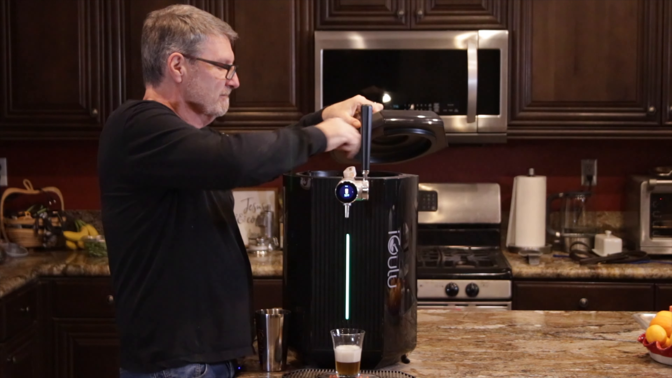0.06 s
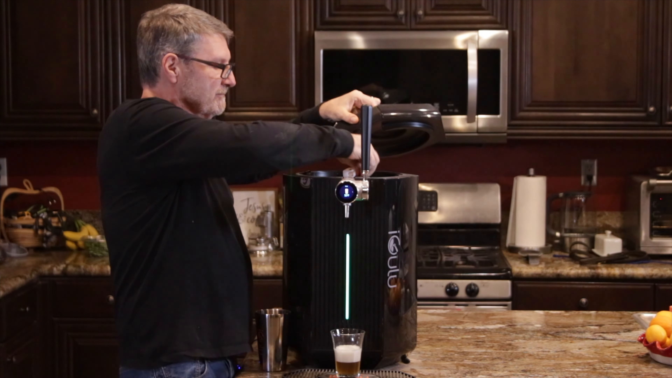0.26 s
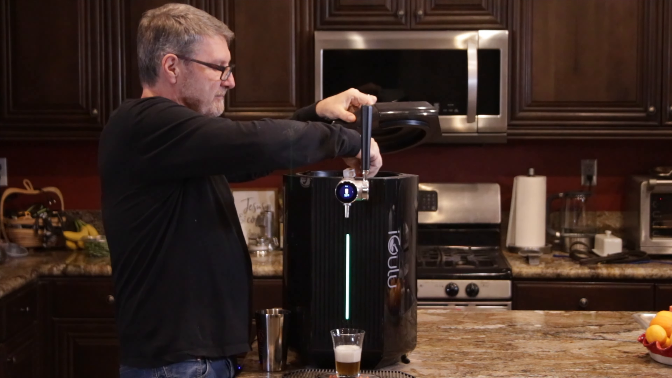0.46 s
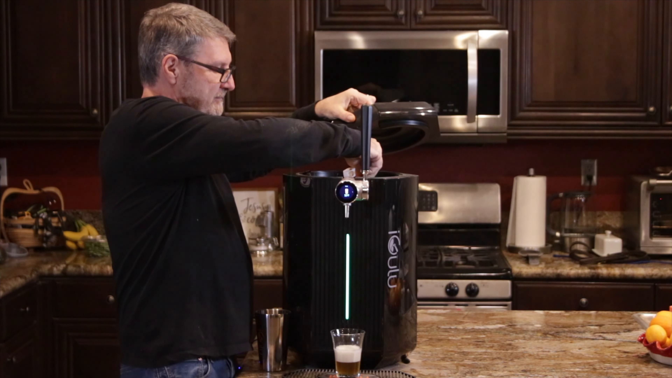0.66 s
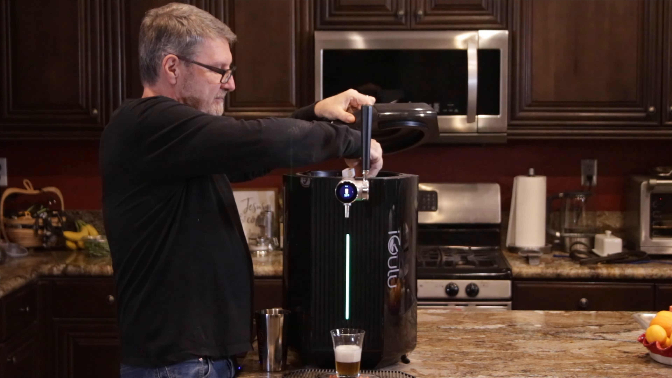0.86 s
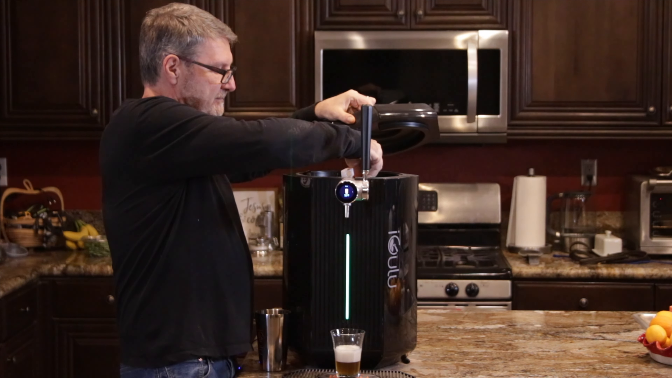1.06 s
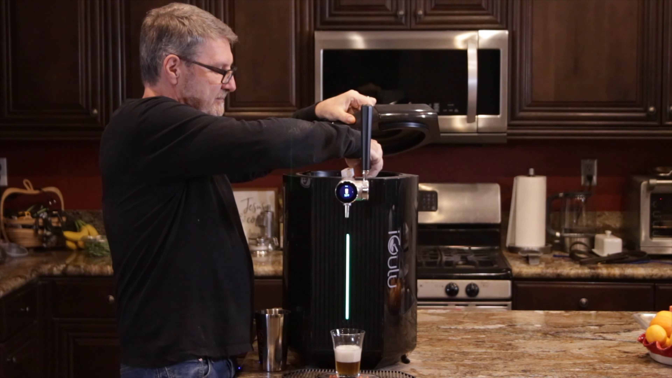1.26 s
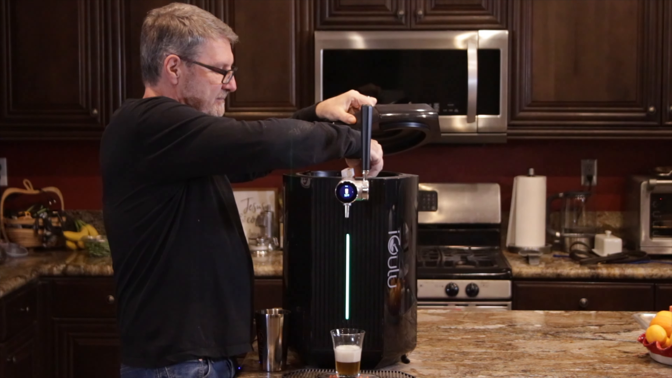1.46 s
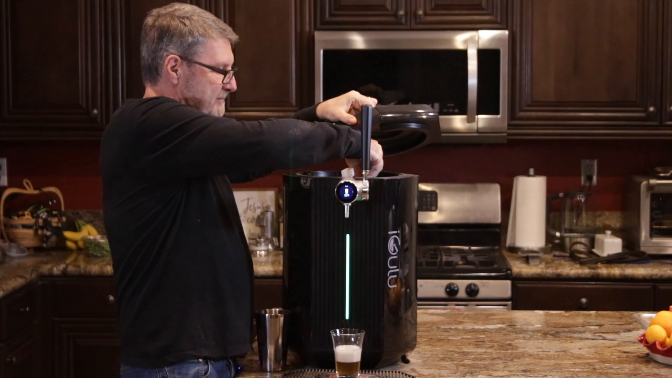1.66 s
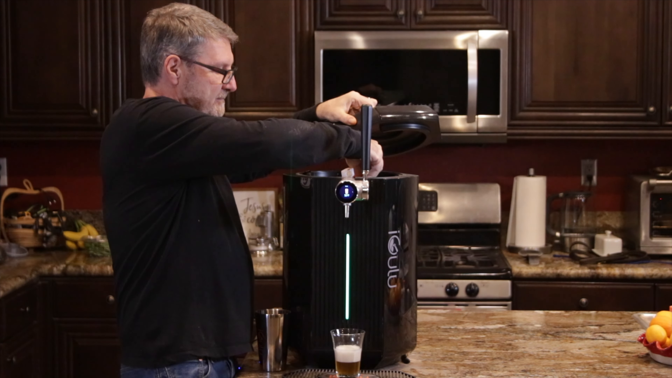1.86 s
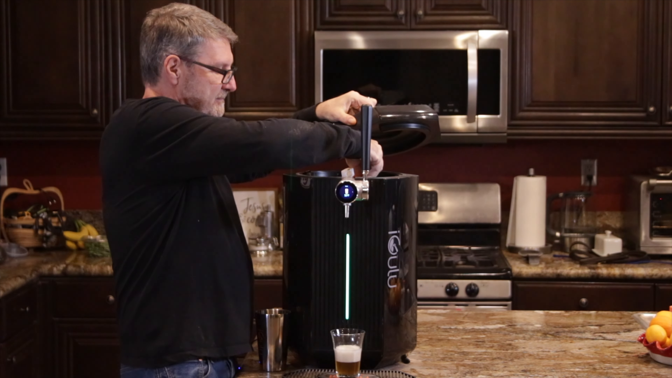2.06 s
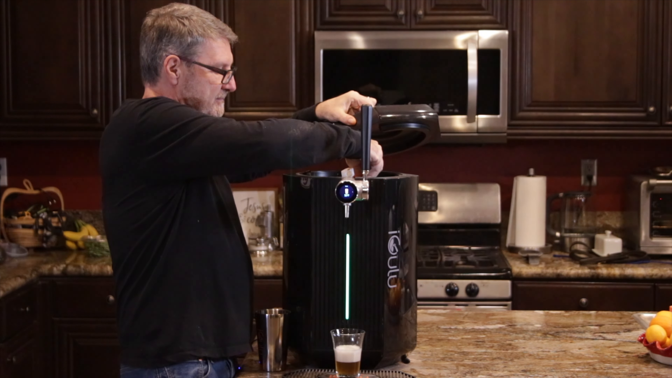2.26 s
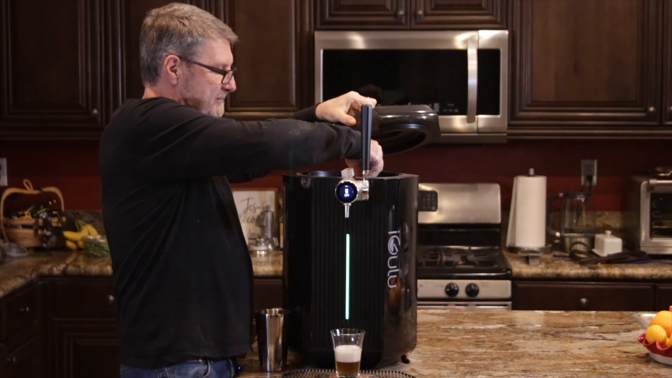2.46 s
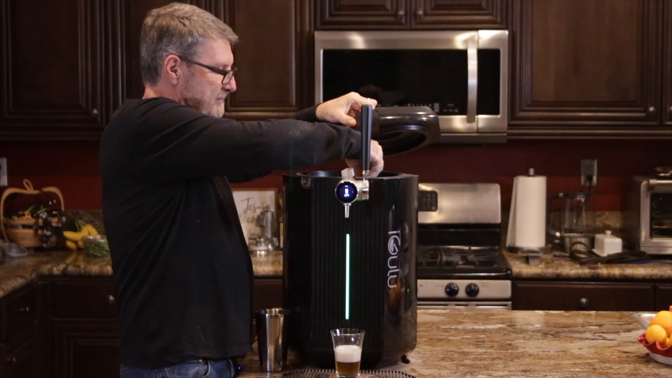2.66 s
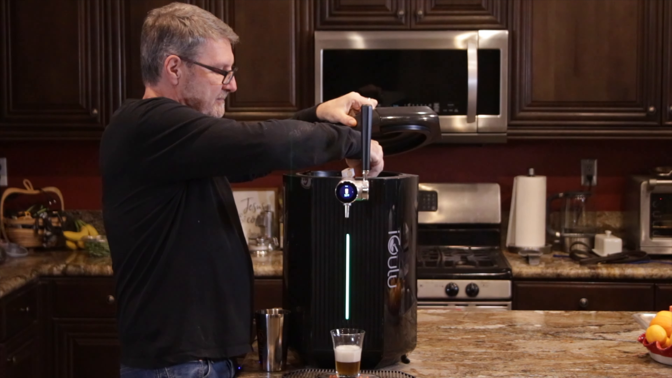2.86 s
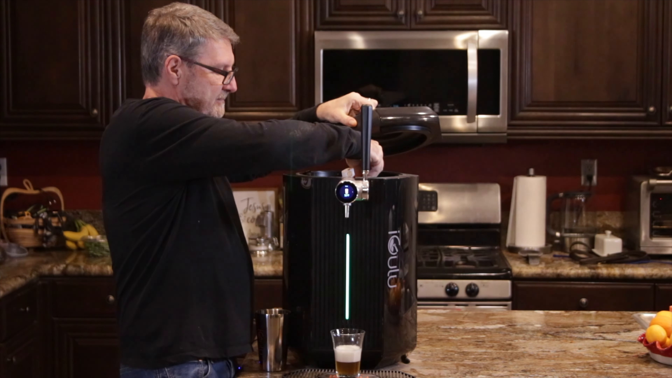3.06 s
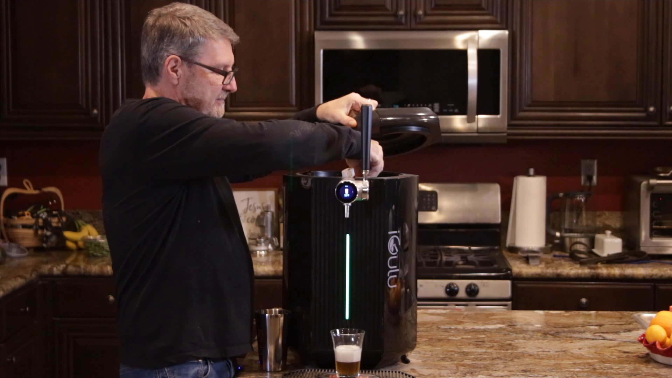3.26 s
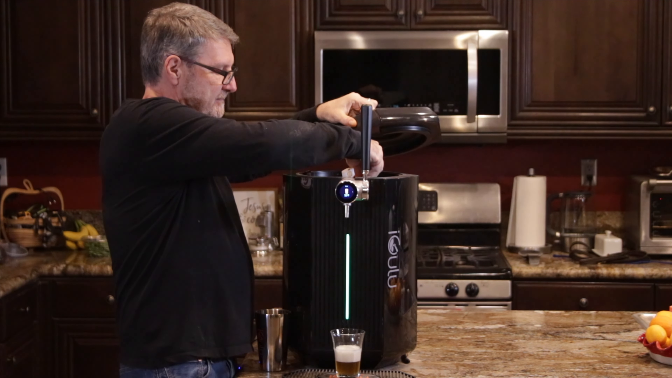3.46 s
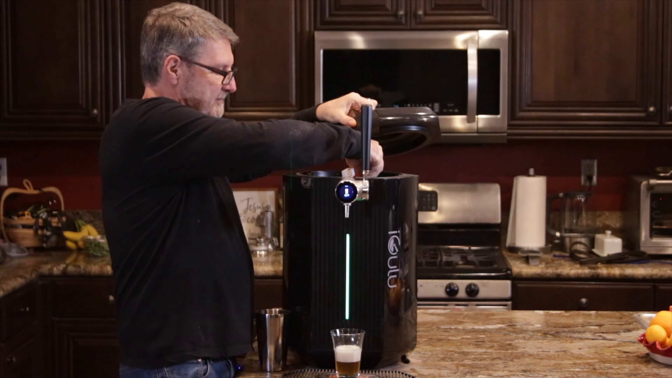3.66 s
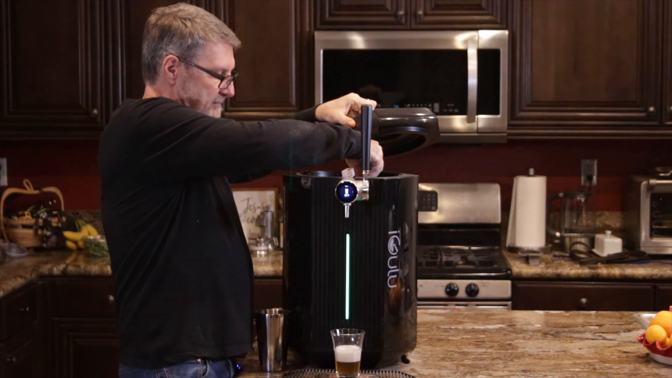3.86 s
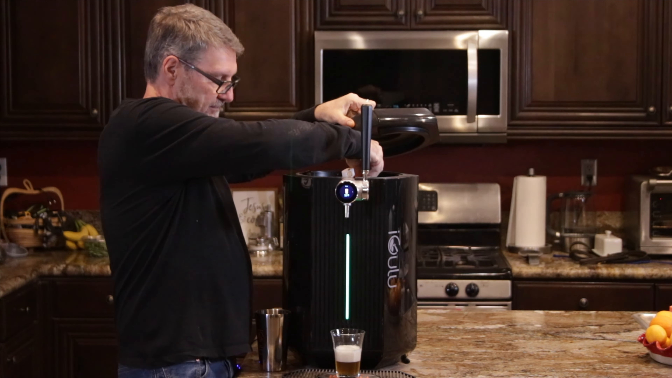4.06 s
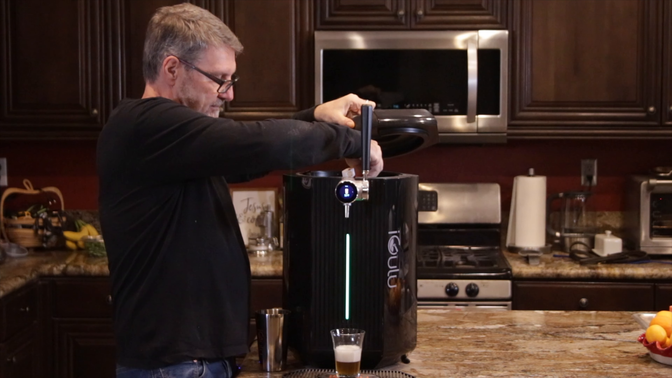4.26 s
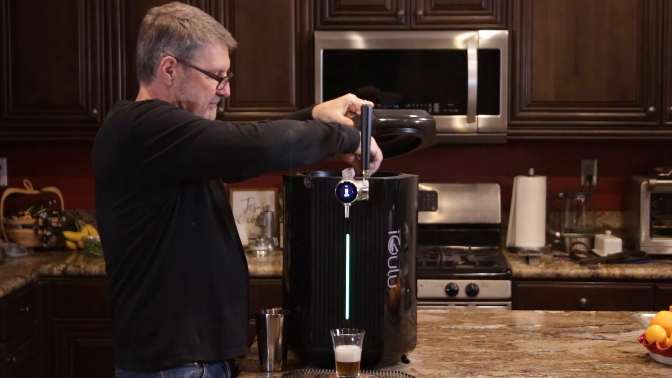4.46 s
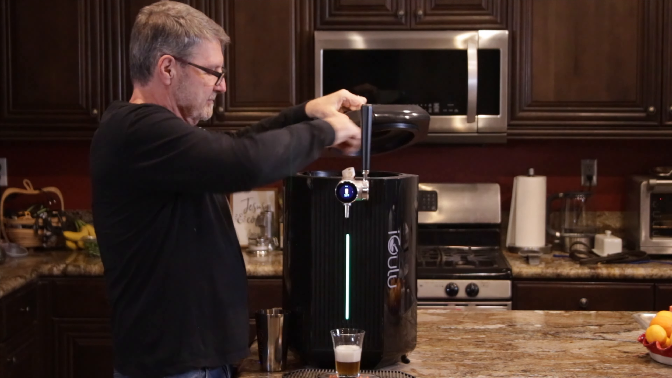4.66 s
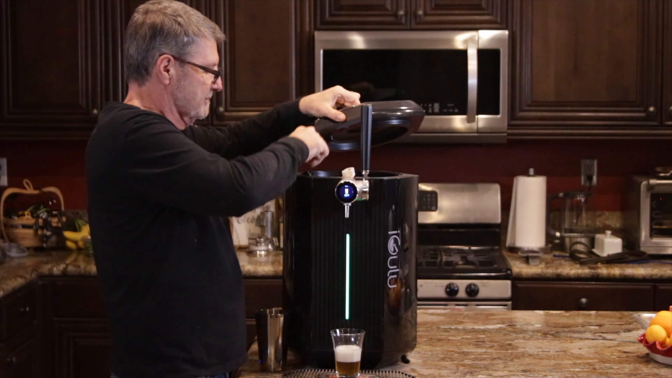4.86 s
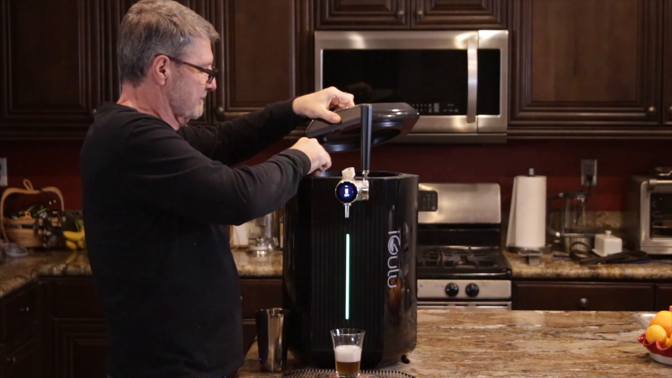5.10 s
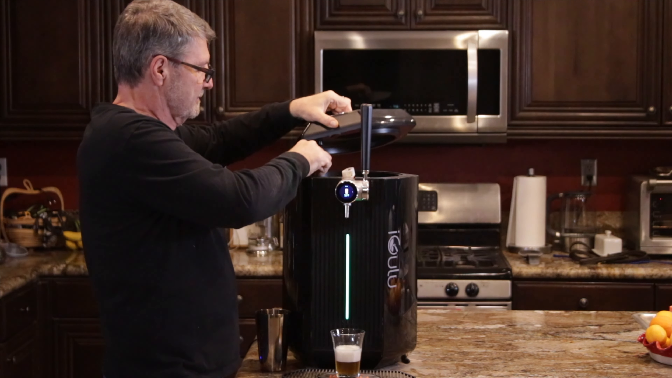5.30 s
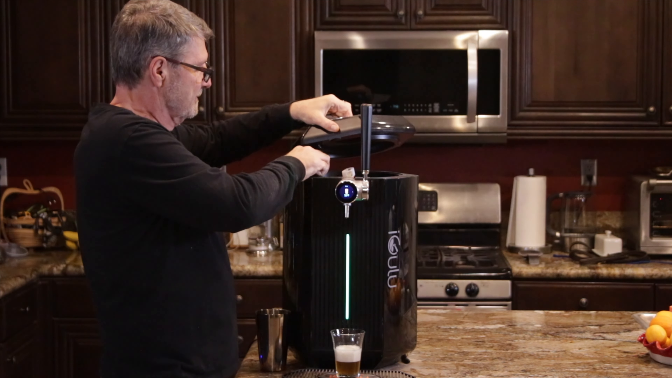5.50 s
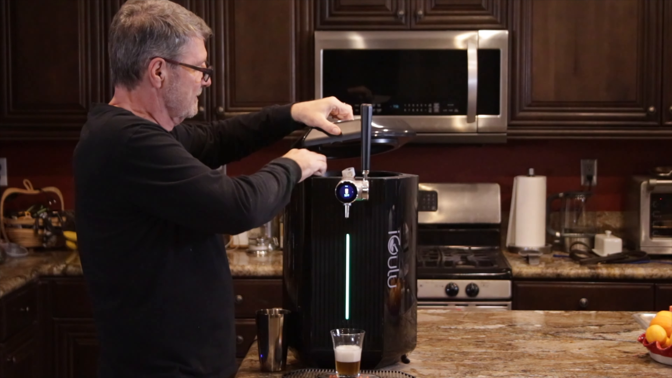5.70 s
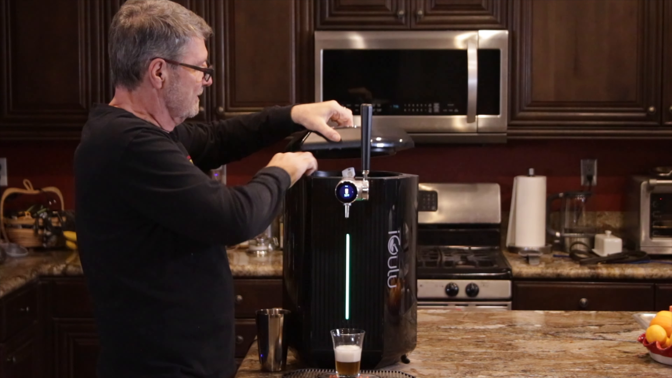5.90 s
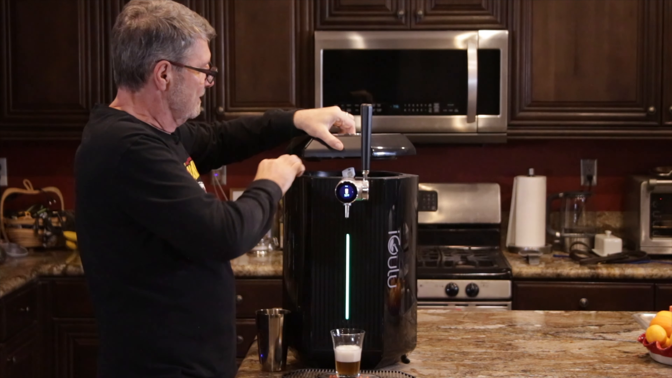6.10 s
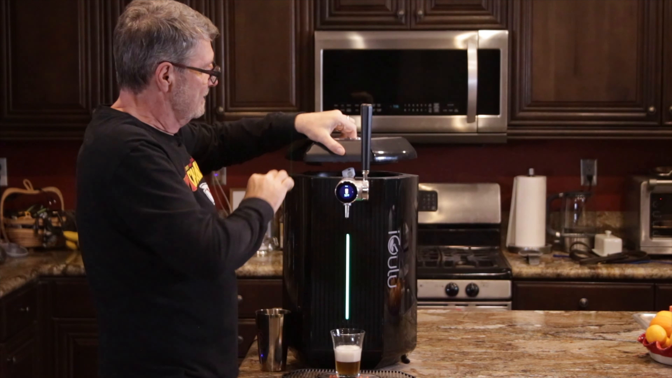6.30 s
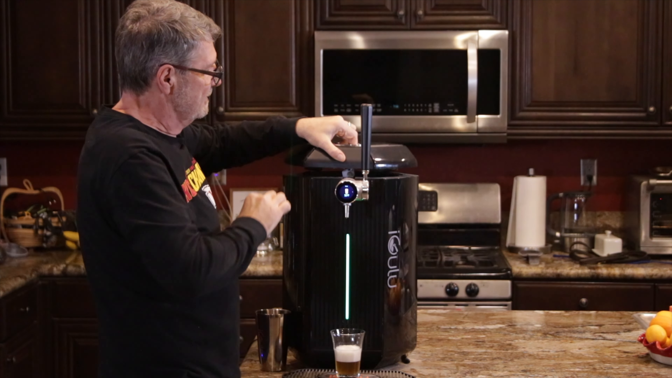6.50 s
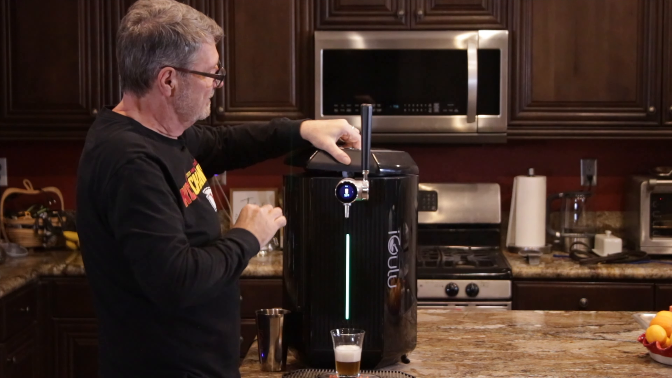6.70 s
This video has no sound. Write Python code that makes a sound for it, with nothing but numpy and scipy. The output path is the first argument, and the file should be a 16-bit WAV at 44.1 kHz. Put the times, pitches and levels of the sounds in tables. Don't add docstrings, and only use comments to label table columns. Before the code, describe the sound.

Quiet kitchen, then a fierce gas hiss from a small keg, slowly losing treble before stopping dead, followed by light plastic handling clunks and a crisp click.

```python
import sys
import numpy as np
from scipy import signal
from scipy.fft import rfft, irfft
from scipy.io import wavfile
from scipy.ndimage import uniform_filter1d

SR = 44100
rng = np.random.default_rng(int(sys.argv[2]) if len(sys.argv) > 2 else 0)


def ratio(d):
    e = np.asarray(d, float) / 20
    return 10 ** e


def generate_wav(sig):
    pcm = np.round(np.clip(np.atleast_2d(sig).T, -1, 1) * 32767).astype(np.int16)
    wavfile.write(sys.argv[1], SR, pcm)


N = 297234

# frequency in Hz, level in dB per Hz.
HISS_SPECTRUM = [(12, -47), (20, -33), (76, -1.5), (145, -4.5), (290, -6.5), (551, -11), (651, -12.5),
                 (749, -13), (814, -9.5), (885, -14.5), (1340, -15), (1930, -17), (15600, -19.5)]
# frequency in Hz, level in dB per Hz.
SIDE_HISS_SPECTRUM = [(12, -39), (20, -9), (104, -3), (145, 1), (246, -6), (307, -2), (1340, -9),
                      (12800, -8.5), (15600, -17)]
# start in seconds, peak in dB, pitch in Hz, length in cycles.
FLOOR_THUMPS = [
    (.905, -29, 32.8, 0.81),
    (4.297, -42, 35.8, 1.5),
    (4.368, -51, 36, 1.2),
    (5.845, -27.5, 30, 1.1),
    (6.263, -40, 28, 1),
    (6.33, -47.5, 28, 1.1),
    (6.70, -30, 28.2, 1.6),
]
# start in seconds, peak in dB,
# pitch in Hz, spread in octaves, length in seconds.
LATCH_SNAPS = [(.195, -52, 6000, .12, 0.045), (5.464, -35, 5000, 0.7, .006), (6.099, -38, 6000, .8, 0.012),
               (6.109, -15, 4000, 1.2, 0.0012), (4.165, -40, 4200, .17, .04),
               (6.114, -26, 1400, 1.1, 0.0025), (6.122, -23.5, 1200, 1.2, 0.0025),
               (6.108, -31, 10500, .4, .009), (5.855, -37, 2900, 0.55, 0.044),
               (5.878, -27, 1250, 0.7, 0.065), (6.70, -25, 1500, 0.65, 0.053),
               (6.659, -32, 1300, .35, .016), (5.441, -45, 4000, .5, .03), (6.1, -44, 260, 1.1, 0.14),
               (6.125, -44, 5000, 1.1, .006), (6.237, -38, 4000, 0.28, .002),
               (5.837, -31, 3400, 0.59, .003), (6.669, -47, 5500, .4, .004), (6.693, -25, 2150, 0.5, .007)]
# frequency in Hz, level in dB, time to fall by 105 dB in seconds.
LID_MODES = [(175, -27, 0.087), (288, -19.5, 0.11), (332, -8, .09), (422, -9, 0.043), (582, -15.5, .08),
             (744, -9.5, 0.12), (810, -4.5, 0.14), (925, 2.5, 0.082), (990, 3, 0.041), (1175, 5, 0.05),
             (1350, 0, 0.055), (1493, 7.5, 0.046), (1760, 5, 0.033), (1957, 4, 0.086), (2160, 10, 0.043),
             (2394, 1, 0.027), (2940, -5, 0.071), (3350, 4, 0.024), (3670, -4.5, 0.066), (4500, 5, 0.036),
             (5300, 19, .02), (6000, -1, 0.024)]
# start in seconds, peak in dB, struck pitch in Hz, rattle in seconds.
LID_KNOCKS = [(.304, -52, 380, 0.012), (4.293, -52, 600, 0.041), (5.012, -44.5, 2300, .014),
              (5.022, -42, 740, 0.012), (5.389, -45.5, 890, 0.0052), (5.441, -44, 2000, .015),
              (5.452, -45, 700, 0.016), (5.461, -35, 2100, 0.008), (5.475, -43, 160, 0.008),
              (5.836, -19.5, 1000, .014), (5.853, -20, 1010, 0.0047), (5.859, -16, 950, 0.0069),
              (5.867, -17, 1060, 0.011), (5.883, -25, 1010, 0.017), (5.92, -28, 1120, 0.015),
              (5.948, -33, 950, 0.006), (6.171, -47, 1240, .006), (6.635, -39, 850, 0.0036),
              (6.644, -36, 1000, 0.011), (6.656, -29, 1280, 0.012), (6.671, -35, 1300, 0.0052),
              (6.692, -23, 360, 0.0049), (6.704, -23, 300, 0.011), (6.716, -26, 297, .008),
              (6.724, -32, 700, 0.018)]
# frequency in Hz, width in Hz, lift in dB.
JET_STRIPES = [(325, 66, 2), (880, 113, 4.5), (3870, 250, 1.5), (4600, 180, 3.5), (6230, 150, 2),
               (7430, 120, 4.5), (8280, 220, 2.5), (9600, 200, 3.5), (10620, 330, 2.5), (12370, 250, 4.5),
               (13200, 340, 5.5), (15000, 370, -0.5), (5250, 180, 0.5), (9030, 180, -1.5), (11750, 270, -1),
               (13800, 250, -4)]
# frequency in Hz, level in dB per Hz.
VALVE_SPECTRUM = [(1120, -25), (1900, -29), (2680, -14), (2910, -8), (3280, -7.5), (3730, -2.5),
                  (4260, -4.5), (4560, -2), (5160, -5), (5630, -13), (6500, -13.5), (8450, -24.5),
                  (14300, -120)]
# frequency in Hz, level in dB per Hz.
SHEAR_SPECTRUM = [(3060, -29), (5200, -2.5), (5670, -10), (7330, -8), (8780, -9.5), (10400, -7),
                  (11600, -11), (12900, -13), (14700, -11), (15300, -17.5)]
# frequency in Hz, level in dB per Hz.
DRONE_SPECTRUM = [(35, -52), (60, -30), (86, -40), (118, -4.5), (290, -4), (656, -5.5), (827, -0.5),
                  (1090, -6.5), (1930, -6), (2400, -2.5), (3120, -45), (5280, -120)]
# time in seconds, level in dB against wide open.
VALVE_OPENING = [
    (.83, -52),
    (.868, -26),
    (.895, -11.5),
    (.918, 4.8),
    (.94, 0.8),
    (1.09, -.3),
    (1.118, 2),
    (1.2, -.1),
    (4.146, 0.4),
]

HISS_DB, SIDE_HISS_DB, RUMBLE_DB = -57, -60, -76.5
WAKE_S, WAKE_DB, DUCK_DB, DUCK_HOLD_S = .2, -4.5, -18, 1.8
SURGE_S, SURGE_DB, SURGE_FADE_S = 5.84, 5, .2
COOLER_DB, COOLER_IDLE_DB, COOLER_RISE_S, COOLER_RISE_DB_S, COOLER_FALL_DB_S = -56.5, -79, 2.5, 12, 110
COOLER_HZ, SPIN_UP_HZ, SPIN_UP_S = 843, 12, .5
FLUTTER_DB, FLUTTER_HZ, FLUTTER_S = -17, 85, .05
KITCHEN_T60_S, KITCHEN_TOP_T60_S, KITCHEN_DB = 0.55, .3, -10.5
KNOCK_SPREAD_OCT, DENSE_DB, DENSE_DB_OCT = .5, -26, 5.5
LIGHT_DB, FINGER_S = -34, .022
OPEN_S, SHUT_S, UNCHOKE_S = .918, 4.146, 2.85
SNAP_SHUT_DB_S = 480
VALVE_DB, CHOKED_SAG_DB_S, FREE_SAG_DB_S = -23.8, .4, 5.5
SHEAR_DB, SHEAR_POWER, SHEAR_LOSS_DB_S2 = -.7, 1.4, .98
DRONE_DB, DRONE_POWER, DRONE_SAG, DRONE_FADE_DB_S = -43.6, 1.1, .6, 85
BOOM_HZ, BOOM_OCT, BOOM_DB_S, BOOM_EVEN_S = 150, 1.0, 3.2, 2.7


def unit(x):
    return x / np.sqrt(np.mean(x ** 2))


def shape(x, points):
    hz, db = np.transpose(points)
    f = np.maximum(np.fft.rfftfreq(len(x), 1 / SR), 1)
    return irfft(rfft(x) * ratio(np.interp(np.log(f), np.log(hz), db)), len(x))


def bump(x, hz, spread_oct):
    f = np.maximum(np.fft.rfftfreq(len(x), 1 / SR), 1)
    return irfft(rfft(x) * np.exp(-.5 * (np.log2(f / hz) / spread_oct) ** 2), len(x))


def walk(rate_hz):
    k = max(int(SR / rate_hz), 1)
    held = np.repeat(rng.standard_normal(N // k + 1), k)
    slewed = uniform_filter1d(uniform_filter1d(held, k), k)
    return unit(slewed[:N])


def hiss():
    t = np.arange(N) / SR
    wake_db = WAKE_DB * np.clip(1 - t / WAKE_S, 0, 1) ** .5
    duck_db = DUCK_DB * (t > OPEN_S) * np.exp(-((t - OPEN_S) / DUCK_HOLD_S) ** 4)
    surge_db = SURGE_DB * (t > SURGE_S) * np.exp(-np.abs(t - SURGE_S) / SURGE_FADE_S)
    gain = ratio(wake_db + duck_db + surge_db)
    rumble = shape(rng.standard_normal(N) * ratio(7.6 * walk(3.4)),
                   [(40, -14), (120, -5.5), (400, 1.5), (900, 0), (1500, -31)])
    mid = ratio(HISS_DB) * unit(shape(rng.standard_normal(N), HISS_SPECTRUM)) + ratio(RUMBLE_DB) * unit(rumble)
    side = ratio(SIDE_HISS_DB) * unit(shape(rng.standard_normal(N), SIDE_HISS_SPECTRUM))
    return gain * mid, gain * side


def cooler():
    t = np.arange(N) / SR
    flat_hz = np.minimum(SPIN_UP_HZ * np.exp((COOLER_RISE_S - t) / SPIN_UP_S), 60)
    hz = COOLER_HZ - flat_hz + 1.5 * walk(6)
    whine = np.sqrt(2) * np.sin(2 * np.pi * np.cumsum(hz) / SR) * ratio(2.5 * walk(5))
    rise_db = COOLER_RISE_DB_S * np.maximum(COOLER_RISE_S - t, 0)
    fall_db = COOLER_FALL_DB_S * np.maximum(t - SHUT_S, 0)
    swell = ratio(COOLER_DB - rise_db - fall_db) * (t > OPEN_S)
    return whine * (swell + ratio(COOLER_IDLE_DB) * (t > COOLER_RISE_S))


def thumps():
    t, out = np.arange(N) / SR, np.zeros(N)
    shudder = unit(bump(rng.standard_normal(N), FLUTTER_HZ, .6))
    for start_s, peak_db, hz, cycles in FLOOR_THUMPS:
        turns = np.maximum(t - start_s, 0) * hz
        shove = np.sin(2 * np.pi * turns) * np.exp(-2 * turns / cycles)
        flutter = ratio(FLUTTER_DB) * shudder * np.exp(-turns / hz / FLUTTER_S)
        out += ratio(peak_db + 1.5) * (shove + flutter) * (1 - np.exp(-9 * turns))
    return out


def kitchen(x):
    t = np.arange(int(.8 * SR)) / SR
    lows = signal.lfilter([.45], [1, -.55], rng.standard_normal(len(t)))
    highs = rng.standard_normal(len(t))
    tail = lows * ratio(-60 * t / KITCHEN_T60_S) + 0.4 * highs * ratio(-60 * t / KITCHEN_TOP_T60_S)
    tail *= np.clip(t / 0.0068, 0, 1)
    return signal.fftconvolve(x, tail / np.sqrt(np.sum(tail ** 2)))[:N]


def latch():
    out, t = np.zeros(N + SR), np.arange(SR // 5) / SR
    for start_s, peak_db, hz, spread_oct, length_s in LATCH_SNAPS:
        jolt = rng.standard_normal(len(t))
        jolt[8] = -.013 / length_s
        snap = bump(jolt, hz, spread_oct) * np.exp(-t / length_s)
        i = int(start_s * SR)
        out[i:i + len(t)] += ratio(peak_db) * snap / np.abs(snap).max()
    return out[:N]


def lid():
    out, t = np.zeros(N + SR), np.arange(SR // 8) / SR
    hz, db, fall_105_db_s = np.transpose(LID_MODES)[:, :, None]
    for start_s, peak_db, struck_hz, rattle_s in LID_KNOCKS:
        near = np.exp(-.5 * (np.log2(hz / struck_hz) / KNOCK_SPREAD_OCT) ** 2)
        chance = rng.standard_normal((2, len(LID_MODES), 1))
        ring = np.sin(2 * np.pi * hz * (1 + 0.022 * chance[0]) * t) * ratio(-105 * t / fall_105_db_s)
        body = np.sum(near * ratio(db + 3.1 * chance[1]) * ring, axis=0)
        damping = np.exp(-t / FINGER_S * (peak_db < LIGHT_DB))

        noise = rng.standard_normal((2, len(t)))
        taps = noise[0] * np.abs(noise[0]) * np.exp(-(t / rattle_s) ** 2)
        taps[0] = 1.3
        knock = signal.fftconvolve(taps, body * damping)[:len(t)]

        dense_db = DENSE_DB + DENSE_DB_OCT * np.log2(struck_hz / 1000)
        dense = unit(bump(noise[1], 1.24 * struck_hz, 1.46 * KNOCK_SPREAD_OCT))
        dense = dense * np.exp(-t / (.004 + 0.92 * rattle_s)) * (1 - np.exp(-t / (0.17 * rattle_s)))

        top_hz = min(2.6 * struck_hz * 2 ** KNOCK_SPREAD_OCT, 15000)
        soft = signal.butter(2, [struck_hz / 2.6, top_hz], "band", fs=SR)
        contact = knock / np.abs(knock).max() + ratio(dense_db + 15) * dense / 3
        i = int(start_s * SR)
        out[i:i + len(t)] += ratio(peak_db + 4.5) * signal.lfilter(*soft, contact)
    return out[:N]


def stripe(x):
    f = np.fft.rfftfreq(N, 1 / SR)
    lift_db = sum(db / (1 + (2 * (f - hz) / width_hz) ** 2) for hz, width_hz, db in JET_STRIPES)
    return irfft(rfft(x) * ratio(lift_db), N)


def jet():
    t = np.arange(N) / SR
    open_db = np.interp(t, *np.transpose(VALVE_OPENING), -120) - SNAP_SHUT_DB_S * np.maximum(t - SHUT_S, 0)
    sag_db = -CHOKED_SAG_DB_S * (t - OPEN_S) - FREE_SAG_DB_S * np.maximum(t - UNCHOKE_S, 0)
    roar_db = VALVE_DB + sag_db + open_db
    shear_db = VALVE_DB + sag_db + SHEAR_DB + SHEAR_POWER * open_db - SHEAR_LOSS_DB_S2 * (t - OPEN_S) ** 2
    hum_db = np.where(t < SHUT_S, DRONE_POWER * open_db, -DRONE_FADE_DB_S * (t - SHUT_S))
    drone_db = DRONE_DB + DRONE_SAG * sag_db + hum_db
    eddies_db = 1.0 * walk(900) + 0.52 * walk(60)
    out = 0
    for points, level_db in ((VALVE_SPECTRUM, roar_db), (SHEAR_SPECTRUM, shear_db), (DRONE_SPECTRUM, drone_db)):
        eddies = rng.standard_normal(N) * ratio(eddies_db + 0.2 * walk(14))
        out = out + unit(stripe(shape(eddies, points))) * ratio(level_db)
    boom_db = BOOM_DB_S * (np.minimum(t, SHUT_S) - BOOM_EVEN_S)
    return out + bump(out, BOOM_HZ, BOOM_OCT) * (ratio(boom_db) - 1)


def scene():
    floor, floor_side = hiss()
    shoves, snaps, taps, gas = thumps(), latch(), lid(), jet()
    room = kitchen(taps + ratio(-8) * snaps + ratio(-12) * gas)
    low_cut = signal.butter(3, 105, "high", fs=SR, output="sos")
    airborne = signal.sosfilt(low_cut, gas + taps + snaps + ratio(KITCHEN_DB) * room)
    mid = airborne + shoves + cooler() + floor
    widening = np.clip(np.arange(N) / SR - 1.6, 0, 1)
    side = floor_side + ratio(-8.5) * shoves + ratio(-19) * bump(gas, 200, 1.2) * widening
    return np.array([mid + side, mid - side])


def low_pass(x):
    return signal.sosfilt(signal.butter(12, 15760, fs=SR, output="sos"), x)


def record(dry):
    top_cut = signal.ellip(10, .2, 70, 15760, fs=SR, output="sos")
    return low_pass(signal.sosfilt(top_cut, dry))


dry = scene()
out = record(dry)
generate_wav(out)
```